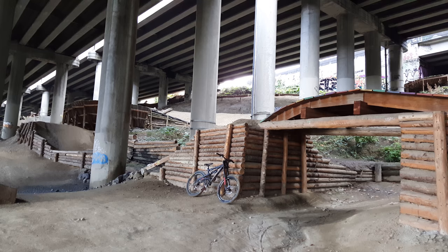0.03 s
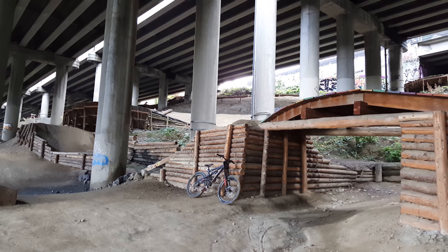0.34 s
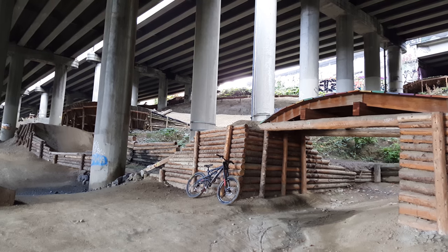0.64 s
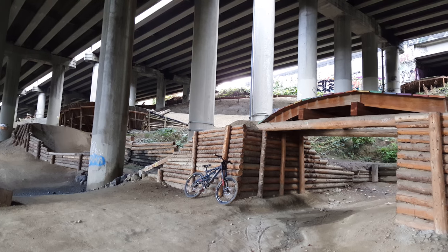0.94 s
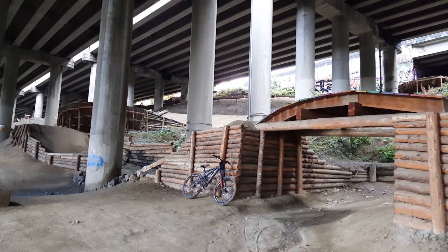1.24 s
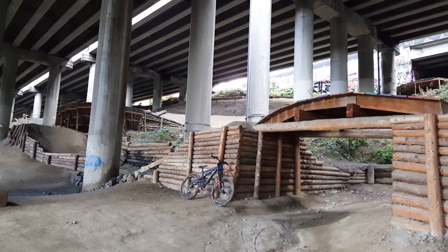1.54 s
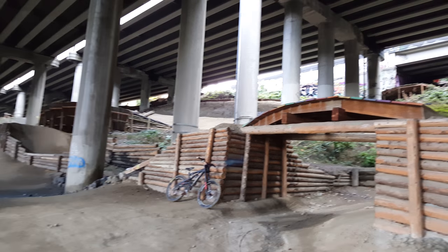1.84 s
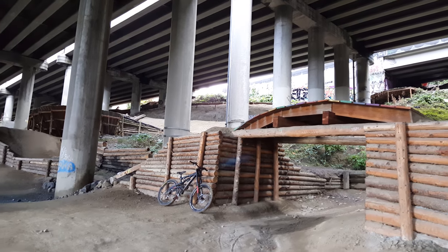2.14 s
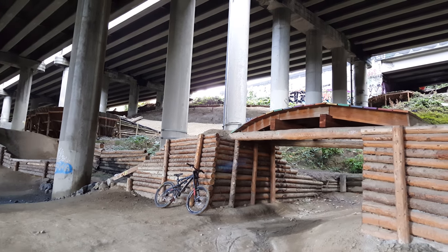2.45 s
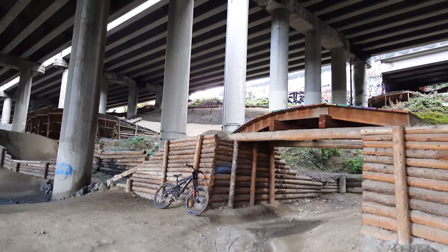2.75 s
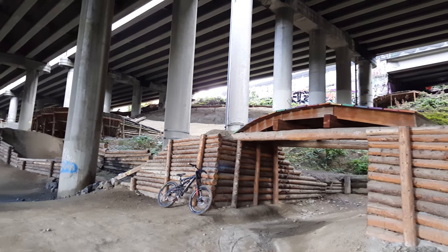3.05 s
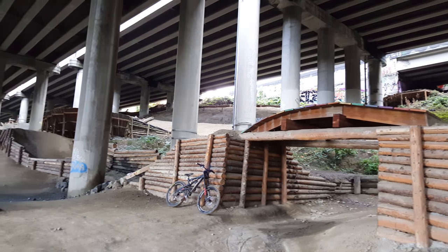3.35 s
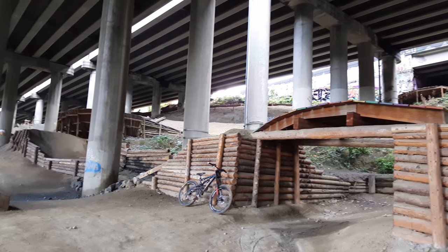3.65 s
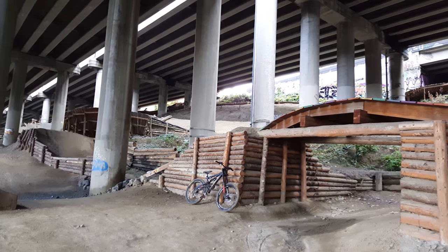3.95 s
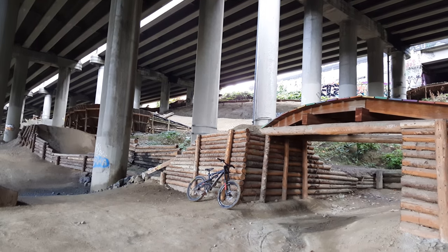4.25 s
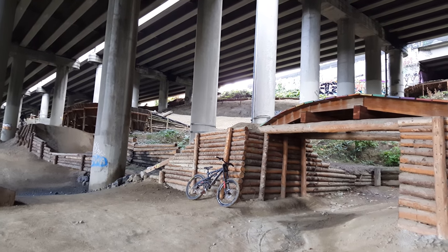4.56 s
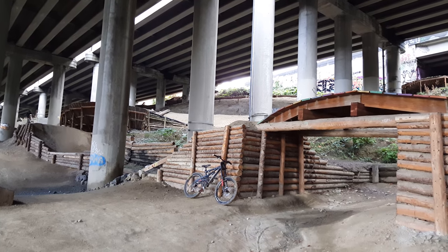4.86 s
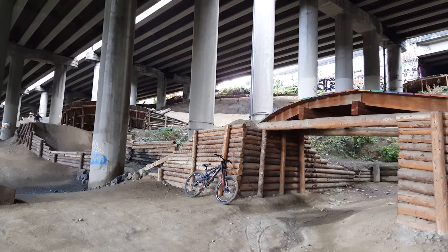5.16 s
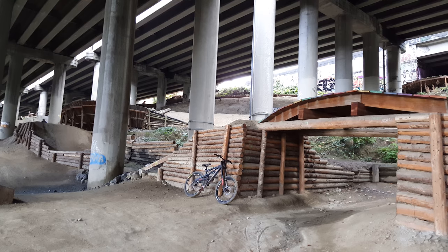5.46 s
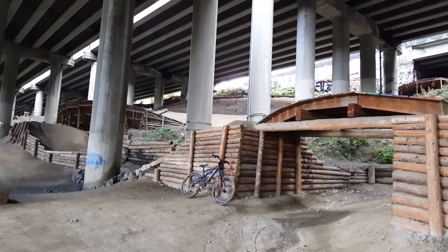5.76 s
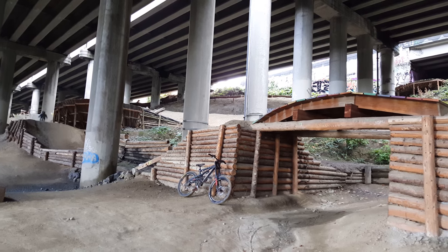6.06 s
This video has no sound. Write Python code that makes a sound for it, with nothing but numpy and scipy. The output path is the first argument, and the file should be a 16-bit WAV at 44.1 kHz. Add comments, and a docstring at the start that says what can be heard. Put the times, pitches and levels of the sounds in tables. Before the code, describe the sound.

Traffic roars on a concrete highway overhead, with echoing thumps of axles over a joint and a faint, thin squeal near the end.

```python
"""Axles thump over the expansion joint of a concrete highway viaduct, heard from below.
A heavy truck hits hardest, and the blows echo among the columns.
Tyres roar overhead and the deck booms at its own resonances.
Close by, a thin squeal wavers under faint high whistles and something clicks once.
The sound fades in after a short silence."""
import sys
import numpy as np
from scipy.fft import rfft, irfft, next_fast_len
from scipy.io import wavfile
from scipy.ndimage import map_coordinates

SR = 44100
rng = np.random.default_rng(int(sys.argv[2]) if len(sys.argv) > 2 else 0)


def int16_out(signal):
    """Quantize to a 16-bit WAV file."""
    q = np.round(np.clip(np.atleast_2d(signal).T, -1, 1) * 32767)
    wavfile.write(sys.argv[1], SR, q.astype(np.int16))


N = 278712
TIME = np.arange(N) / SR


def amp(db):
    """Decibels to gain."""
    return 10 ** (np.asarray(db) / 20)


def unit(x):
    """Scale to rms 1."""
    return x / np.sqrt(np.mean(x ** 2) + 1e-20)


def gain_at(spectrum, hz):
    """Gain from (Hz, dB) points joined on a log frequency axis."""
    points_hz, points_db = np.transpose(spectrum)
    return amp(np.interp(np.log(hz + 1), np.log(points_hz + 1), points_db))


def wobble(rate):
    """Smooth random curve, rate knots a second."""
    return map_coordinates(rng.standard_normal(int(N * rate / SR) + 4), [TIME * rate])


def hump(peak_s, width_s):
    """Bell curve: 1 at the peak, 1/e at width_s to either side."""
    return np.exp(-((TIME - peak_s) / width_s) ** 2)


def swell(start_s, attack_s, t60_s):
    """Envelope that builds up and dies away."""
    age = np.maximum(TIME - start_s, 0)
    return (1 - np.exp(-age / attack_s)) * amp(-60 * age / t60_s)


def filtered(x, response):
    """Apply a gain given as a function of Hz."""
    size = next_fast_len(N + SR // 2)
    return irfft(rfft(x, size) * response(np.fft.rfftfreq(size, 1 / SR)), size)[..., :N]


def resonances(modes, hz):
    """Gain of separately shaken resonances: their powers add."""
    return np.sqrt(sum(amp(db) ** 2 / (1 + (2 * (hz - centre_hz) / width_hz) ** 2)
                       for centre_hz, width_hz, db in modes))


def diffuse(response, spacing_m=0.12):
    """Noise from all sides at two microphone ports: alike in the bass, unrelated above. Mid rms is 1."""
    def mid_and_side(hz):
        coherence = 0.99 * np.sinc(2 * hz * spacing_m / 343)
        side_gain = np.sqrt((1 - coherence) / (1 + coherence))
        return response(hz) * np.array([np.ones_like(hz), side_gain])
    mid, side = filtered(rng.standard_normal((2, N)), mid_and_side)
    return np.array([mid + side, mid - side]) / np.std(mid)


def coloured(spectrum):
    """Diffuse noise shaped by (Hz, dB) points."""
    return diffuse(lambda hz: gain_at(spectrum, hz))


def tone(hz):
    """Sine with a slightly wandering phase."""
    return np.sin(2 * np.pi * hz * TIME + 0.5 * wobble(6))


def squeak(pitch_hz, width_hz):
    """Rubbing feeds a narrow, gliding resonance: a fuzzy line, never a pure tone."""
    noise = rng.standard_normal((2, N))
    in_phase, quadrature = unit(filtered(noise, lambda hz: 1 / (1 + (2 * hz / width_hz) ** 2)))
    phase = 2 * np.pi * np.cumsum(pitch_hz) / SR
    return in_phase * np.cos(phase) + quadrature * np.sin(phase)


# Each row: peak time in seconds, half width in seconds, level in dB.
RUSTLES = [(2.68, 0.3, -72), (5.25, .04, -70), (6.05, .08, -71)]
# Each row: frequency in Hz, relative density in dB.
RUSTLE_SPECTRUM = [(3000, -15.5), (7000, -1), (9500, -5), (11600, 1.5), (13500, -6.5), (15500, -11.5)]


def rustles():
    """Soft rustles close by on the left."""
    level = sum(amp(db) * hump(peak_s, width_s) for peak_s, width_s, db in RUSTLES)
    return level * coloured(RUSTLE_SPECTRUM) * amp([[1], [-12]])


def brake(peak_s=1.03, pitch_hz=9920):
    """A far brake on the left sings one thin note with a long, faint tail."""
    level = amp(-77) * hump(peak_s, width_s=0.18) + amp(-95) * swell(peak_s, attack_s=0.1, t60_s=6)
    return level * amp(2 * wobble(20)) * tone(pitch_hz) * amp([[1], [-12]])


# Each row: pitch in Hz, level in dB.
WHINES = [(1723, -57), (2746, -65.5)]


def whines():
    """Two faint whines, steady in pitch, drifting in level."""
    return sum(amp(db + 1.7 * wobble(2.5)) * tone(hz) for hz, db in WHINES)


# Each row: start in seconds, length in seconds, level in dB, centre pitch in Hz, glide in Hz per second.
WHISTLES = [(2.293, .15, -74, 14800, -2500), (2.874, 0.087, -80.5, 15100, 0.5),
            (3.428, 0.076, -83, 15100, 0.5), (3.887, .19, -69.5, 14620, -3500),
            (4.19, 0.093, -82, 14000, -5), (4.484, .08, -81, 15000, -1.5), (4.694, .37, -75, 14450, -3),
            (5.17, .88, -71, 14400, -1)]


def whistles(edge_s=0.04, waver_hz=100, flutter_db=3):
    """Very high whistles that waver and flutter: short chirps, then two held notes."""
    level, pitch_hz = np.zeros((2, N))
    for start_s, length_s, db, centre_hz, glide in WHISTLES:
        age = TIME - start_s
        level += amp(db) * np.clip(np.minimum(age, length_s - age) / edge_s, 0, 1)
        note_hz = centre_hz + glide * (np.clip(age, 0, length_s) - length_s / 2)
        pitch_hz = np.where(age < 0, pitch_hz, note_hz)
    level *= amp(flutter_db * wobble(25))
    pitch_hz += waver_hz * wobble(9)
    return level * np.array([squeak(pitch_hz, width_hz=300) for port in range(2)]) * amp([[2.5], [-1.5]])


# Each row: peak time in seconds, level in dB, rise in seconds, t60 in seconds.
SQUEAL_PUSHES = [(4.69, -56, 0.02, 0.78), (4.95, -55, 0.056, .34), (5.31, -50.5, .035, 0.37),
                 (5.59, -53.5, 0.072, 0.62), (5.95, -56, .035, .35)]


def squeal(free_hz=8230, sag_hz=205, hold_s=0.027):
    """Thin squeal on the left: each push swells, pulls the pitch flat and dies away."""
    level, pressure = np.zeros((2, N))
    for peak_s, db, rise_s, t60_s in SQUEAL_PUSHES:
        release = amp(-60 * np.maximum(TIME - peak_s - hold_s, 0) / t60_s)
        level += amp(db) * np.where(TIME < peak_s, hump(peak_s, rise_s), release)
        pressure += hump(peak_s, width_s=0.079)
    pitch_hz = free_hz - sag_hz * pressure
    pan = amp([[4], [-13]])  # only scattered sound reaches the right
    return level * np.array([squeak(pitch_hz, width_hz=170) for port in range(2)]) * pan


# Each row: frequency in Hz, level in dB, t60 in seconds, left minus right in dB.
CLICK_MODES = [(2420, -15.5, 0.0027, -13), (3630, -21, 0.004, -4), (8160, -30.5, 0.003, 5),
               (11500, -34, .0012, 9.5)]


def click(start_s=5.0143):
    """One tiny, dry tick close by; neighbouring modes start in opposite directions."""
    tick = np.zeros((2, N))
    for k, (hz, db, t60_s, pan_db) in enumerate(CLICK_MODES):
        ring = swell(start_s, attack_s=0.0001, t60_s=t60_s) * np.sin(2 * np.pi * hz * (TIME - start_s))
        tick += (-1) ** k * amp([[db + pan_db / 2], [db - pan_db / 2]]) * ring
    return tick


# Each row: resonance in Hz, width in Hz, level over the road noise in dB.
BAY_MODES = [(452.7, 13, 3.5), (562, 69, 1), (703, 36, 0), (1019, 285, 4)]


def through_bays(spectrum):
    """Road noise coloured by the hollow bays between the girders."""
    return diffuse(lambda hz: gain_at(spectrum, hz) * np.hypot(1, resonances(BAY_MODES, hz)))


def concrete(modes, edge_hz, low_cut_hz=27):
    """The deck shaken at its resonances; its mass holds back everything above the edge."""
    def response(hz):
        high_pass = hz ** 4 / (hz ** 4 + low_cut_hz ** 4)
        return resonances(modes, hz) * high_pass / np.hypot(1, (hz / edge_hz) ** 4)
    return diffuse(response)


# Deck resonances, low and middle. Each row: frequency in Hz, width in Hz, relative level in dB.
BOOM_MODES = [(38, 7, -19.5), (60, 9.6, -12), (82, 9.6, -5.5), (94, 7.8, 5.5)]
DRONE_MODES = [(133.2, 23.6, 0), (174, 49, -2.5), (215.3, 25, 0.5), (236, 29, 1.5), (298, 30, -8)]
# Heavy vehicles load the span. Each row: time in seconds, boom level in dB.
SPAN_LOAD = [(.7, -38.5), (1.05, -32.5), (1.7, -37.5), (2.95, -42), (3.1, -32), (3.85, -30), (4.15, -32),
             (5.1, -35.5), (5.35, -26.5), (5.55, -35), (5.85, -31.5), (6.3, -30)]
# Each row: frequency in Hz, relative density in dB.
TYRE_SPECTRUM = [(20, -19.5), (120, 3), (320, 0), (600, -4.5), (800, -6), (1100, -9), (1750, -10.5),
                 (2400, -17), (3350, -18.5), (4100, -32), (5300, -42), (8000, -48), (10000, -59),
                 (15500, -58)]


def traffic(drone_db=-28, roar_db=-27.5):
    """Many vehicles merge into a deck boom, a drone and a tyre roar, each a little restless."""
    load_db = np.interp(TIME, *np.transpose(SPAN_LOAD))
    lull_db = -5.5 * hump(peak_s=3.08, width_s=0.17)  # a gap in the stream of cars
    boom = amp(load_db + 1.2 * wobble(7)) * concrete(BOOM_MODES, edge_hz=101)
    drone = amp(drone_db + lull_db + 0.24 * wobble(5)) * concrete(DRONE_MODES, edge_hz=376)
    roar = amp(roar_db + 0.29 * wobble(11)) * through_bays(TYRE_SPECTRUM)
    return boom + drone + roar


# Each row: start in seconds, blow level in dB, boom level in dB.
AXLES = [(1.463, -19, -41), (1.571, -20.5, -40), (3.398, -20, -44), (3.504, -16, -19.5),
         (3.582, -18.5, -20.5), (3.616, -27, -23), (3.711, -24.5, -22.5), (5.425, -23, -47),
         (6.102, -19.5, -34.5), (6.173, -21, -39), (6.228, -23, -39)]
# The blow, its bright slap and the slap's duller echo. Each row: frequency in Hz, relative density in dB.
BLOW_SPECTRUM = [(60, -28), (250, -3.5), (380, 4.5), (550, 2.5), (700, 0), (900, -15.5), (1500, -13.5),
                 (2200, -22.5), (3400, -30), (4500, -43), (9000, -70.5)]
SLAP_SPECTRUM = [(200, -11), (600, -5), (2000, -3.5), (3400, -0.5), (5000, -16), (8000, -33.5),
                 (15000, -40.5)]
ECHO_SPECTRUM = [(150, -7.5), (330, 4), (700, -8.5), (1100, 4.5), (1550, 1.5), (2200, -9.5), (3400, -16.5),
                 (4500, -29), (9000, -54.5)]


def expansion_joint(hard_force_db=-17, hard_slap_db=-26.5, slap_db_per_db=1.96):
    """Axles strike the joint; blows scatter among the columns and the deck booms. Hard blows slap."""
    blow_power, boom_power, slap_power, echo_power = np.zeros((4, N))
    for start_s, blow_db, boom_db in AXLES:
        force_db = (blow_db + boom_db) / 2
        slap_db = hard_slap_db + slap_db_per_db * (force_db - hard_force_db)
        blow_power += (amp(blow_db) * swell(start_s, attack_s=0.0039, t60_s=0.2)) ** 2
        blow_power += (amp(blow_db - 11) * swell(start_s, attack_s=0.012, t60_s=1.0)) ** 2  # scatter
        boom_power += (amp(boom_db) * swell(start_s, attack_s=0.0087, t60_s=0.64)) ** 2
        slap_power += (amp(slap_db) * swell(start_s, attack_s=0.002, t60_s=0.055)) ** 2
        echo_power += (amp(slap_db + 3) * swell(start_s, attack_s=0.022, t60_s=0.93)) ** 2
    blows = np.sqrt(blow_power) * through_bays(BLOW_SPECTRUM)
    booms = np.sqrt(boom_power) * concrete(DRONE_MODES, edge_hz=173)
    slaps = np.sqrt(slap_power) * coloured(SLAP_SPECTRUM)
    echoes = np.sqrt(echo_power) * coloured(ECHO_SPECTRUM)
    return blows + booms + slaps + echoes


# Each row: frequency in Hz, left minus right in dB.
PORT_BALANCE = [(200, -0.5), (1000, 0.4), (2100, 0.5), (2600, -5.5), (3300, -14), (4000, -6.5), (5100, 1),
                (8000, 15), (9500, 10), (14500, 0.5)]


def ports(x):
    """The two microphone ports ring differently: each favours its own part of the treble."""
    def gains(hz):
        ratio = gain_at(PORT_BALANCE, hz)
        return np.array([ratio, np.ones_like(hz)]) * np.sqrt(2 / (1 + ratio ** 2))
    return filtered(x, gains)


def scene():
    """The viaduct overhead and the small sounds around it."""
    viaduct = traffic() + expansion_joint()
    return ports(viaduct + click()) + squeal() + whistles() + rustles() + brake() + whines()


def record(dry, silence_s=0.367, fade_s=0.27, top_hz=15720):
    """Fade in after a short silence and cut everything above the band limit."""
    fade = np.clip((TIME - silence_s) / fade_s, 0, 1)
    return filtered(dry * fade, lambda hz: hz < top_hz)


dry = scene()
out = record(dry)
int16_out(out)
```